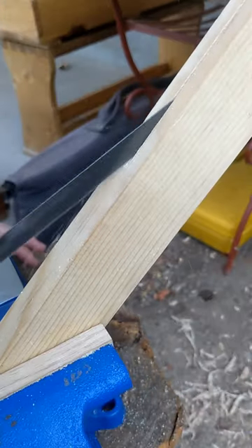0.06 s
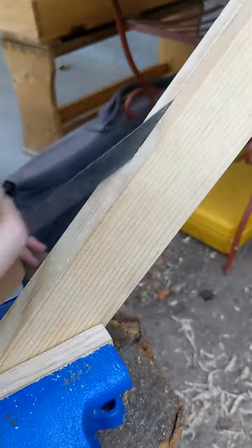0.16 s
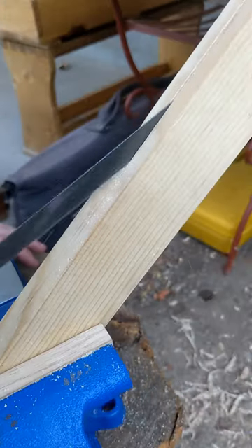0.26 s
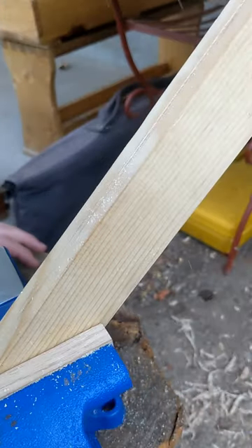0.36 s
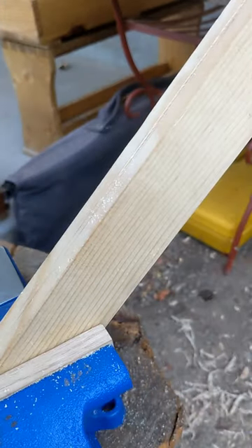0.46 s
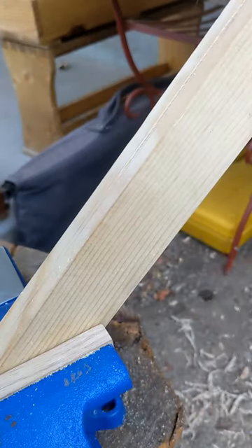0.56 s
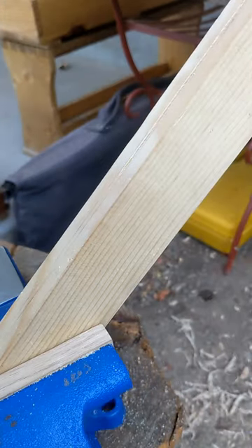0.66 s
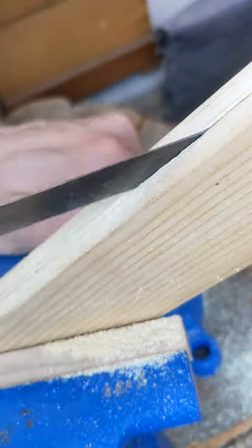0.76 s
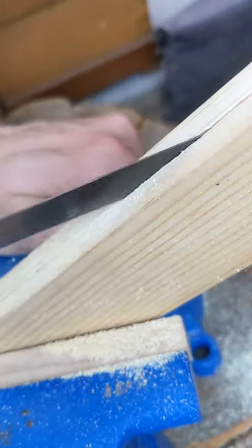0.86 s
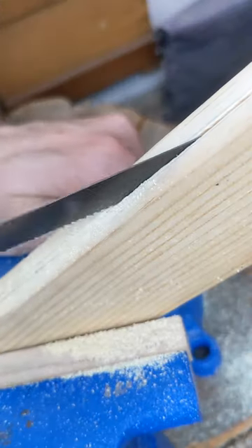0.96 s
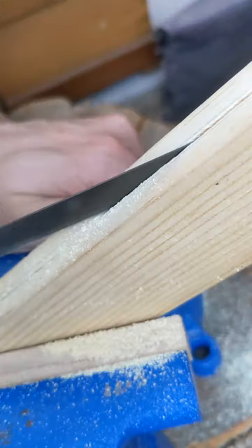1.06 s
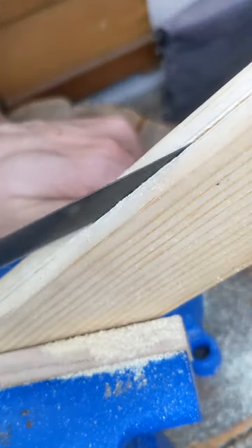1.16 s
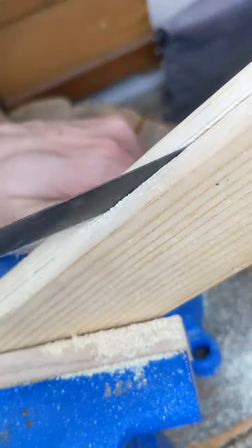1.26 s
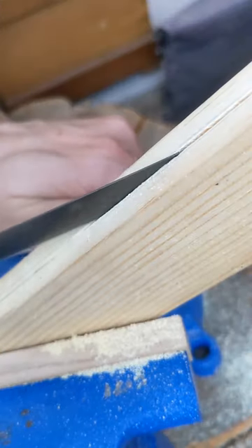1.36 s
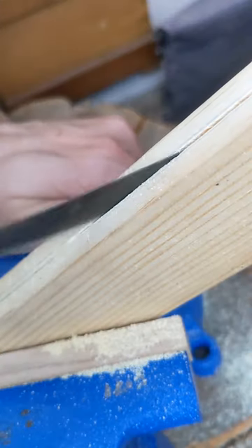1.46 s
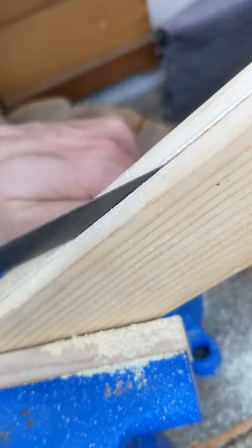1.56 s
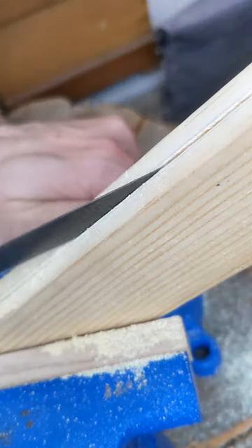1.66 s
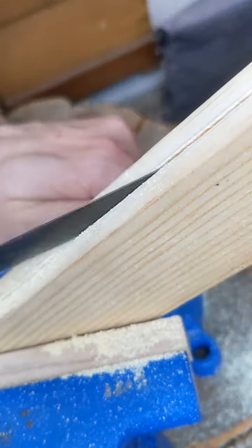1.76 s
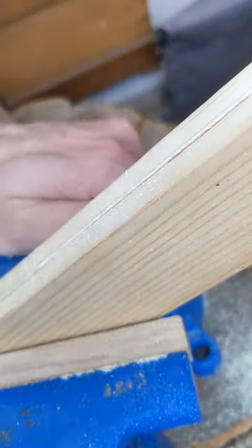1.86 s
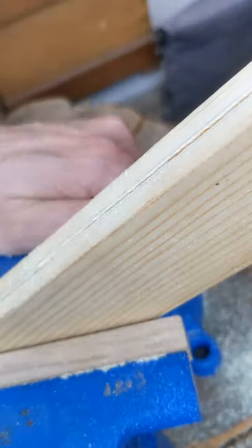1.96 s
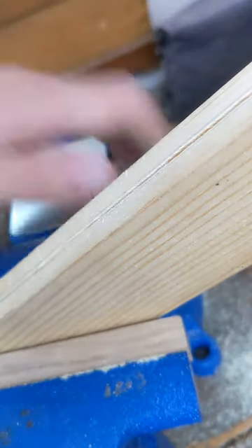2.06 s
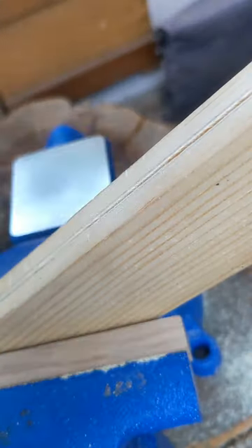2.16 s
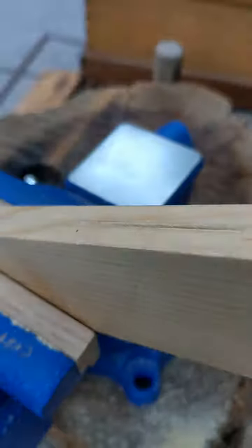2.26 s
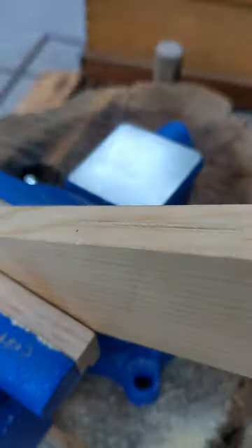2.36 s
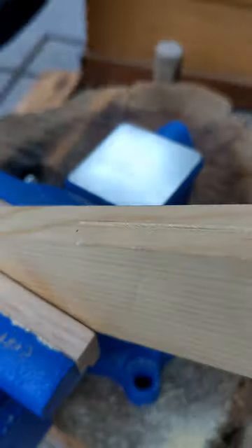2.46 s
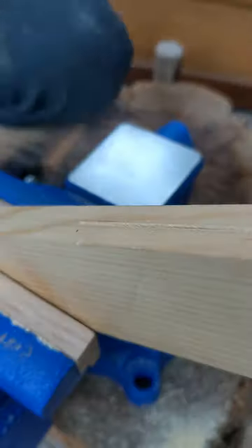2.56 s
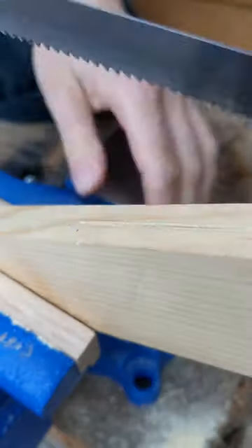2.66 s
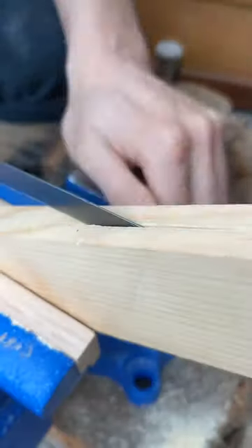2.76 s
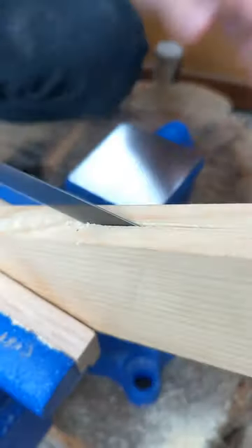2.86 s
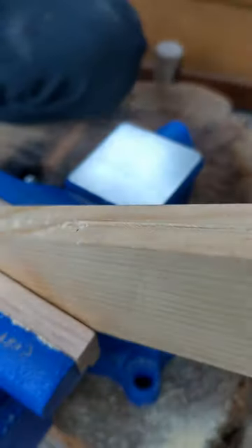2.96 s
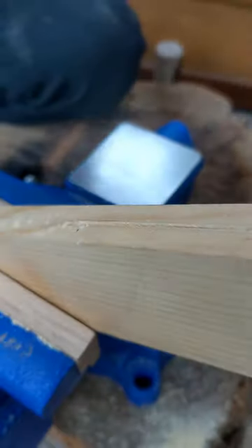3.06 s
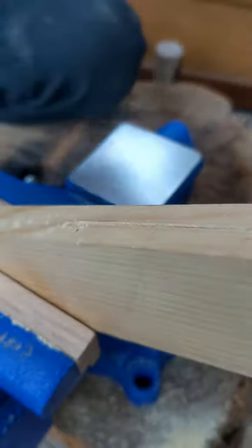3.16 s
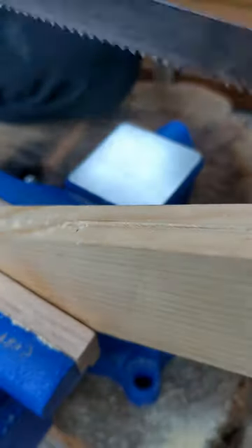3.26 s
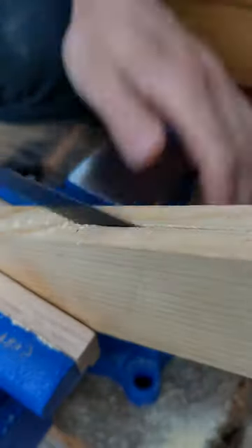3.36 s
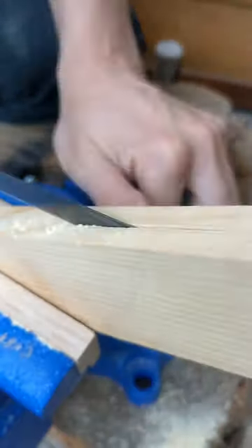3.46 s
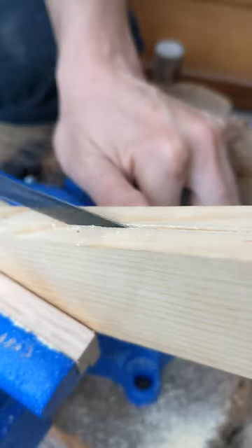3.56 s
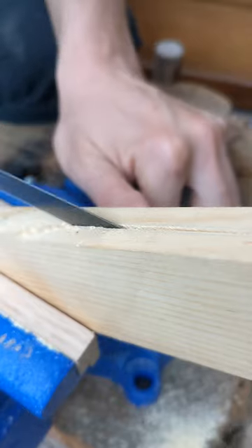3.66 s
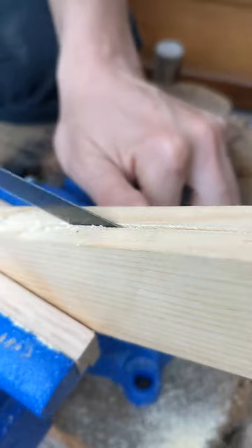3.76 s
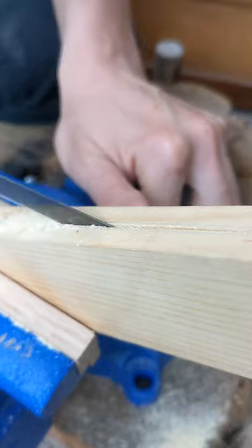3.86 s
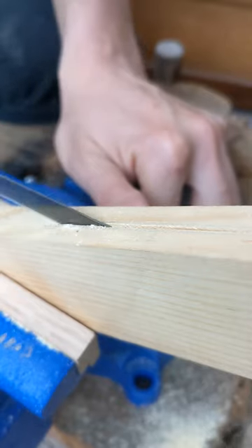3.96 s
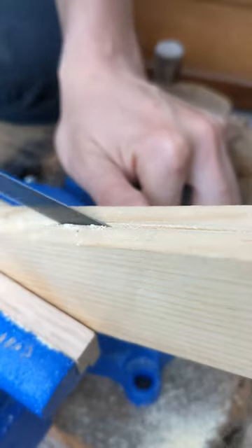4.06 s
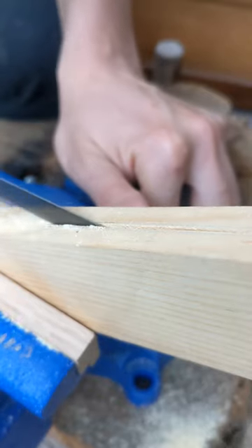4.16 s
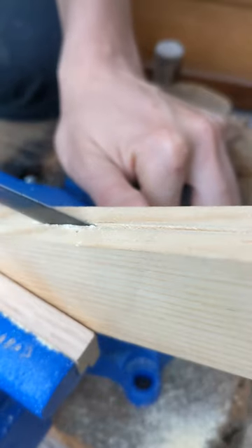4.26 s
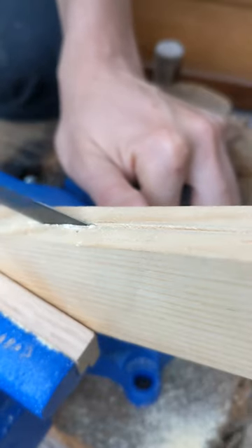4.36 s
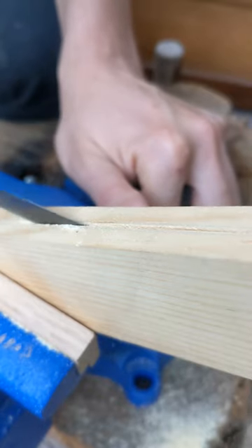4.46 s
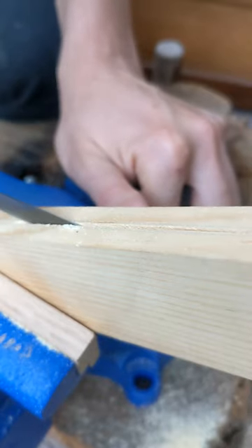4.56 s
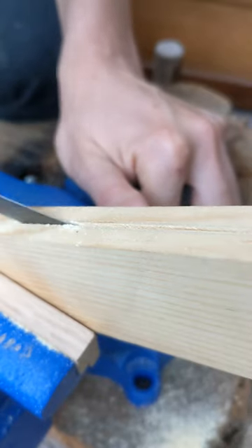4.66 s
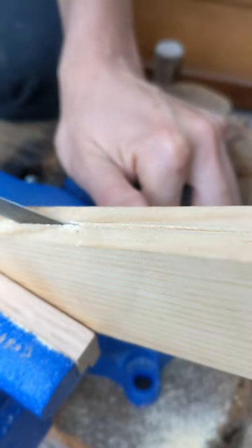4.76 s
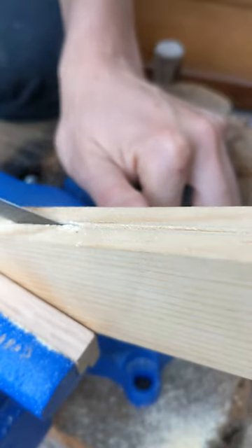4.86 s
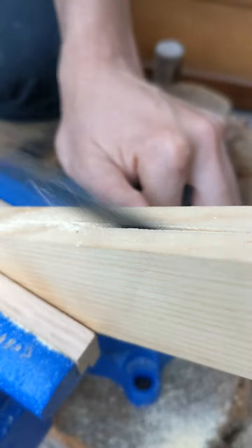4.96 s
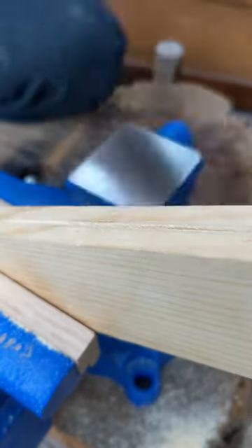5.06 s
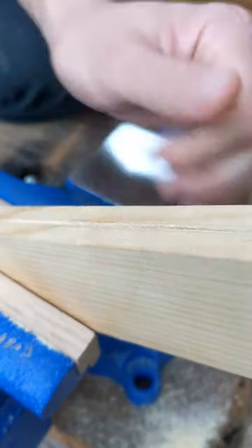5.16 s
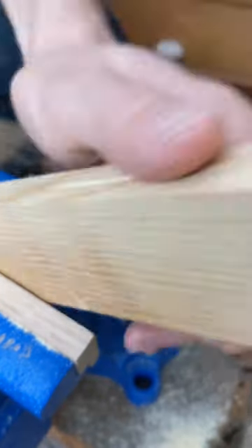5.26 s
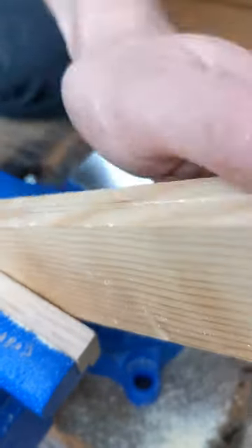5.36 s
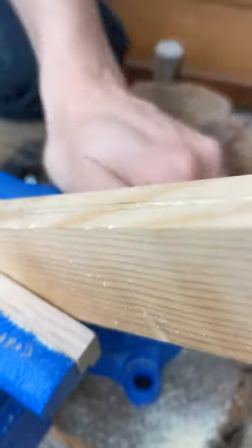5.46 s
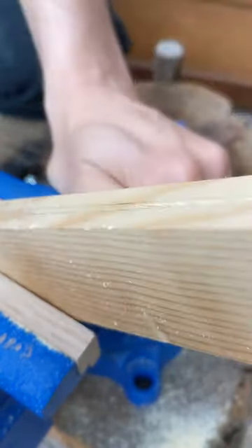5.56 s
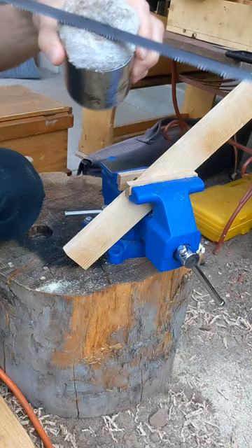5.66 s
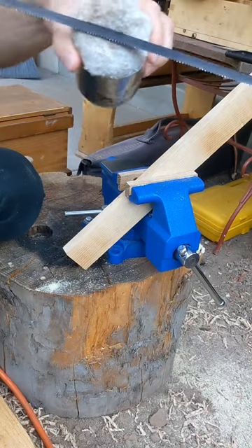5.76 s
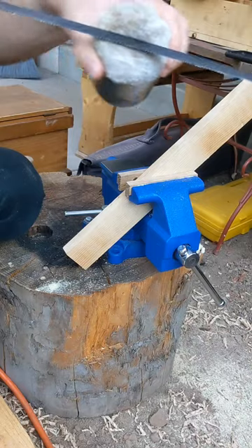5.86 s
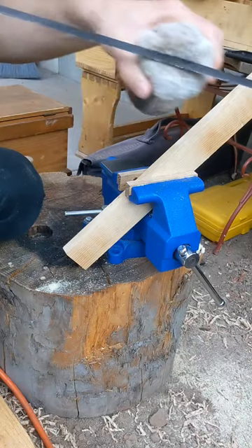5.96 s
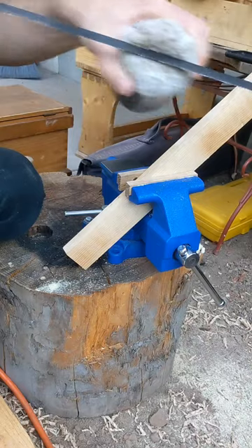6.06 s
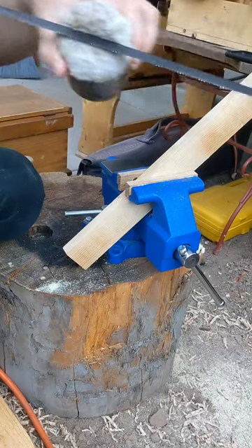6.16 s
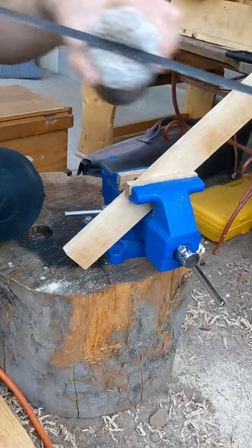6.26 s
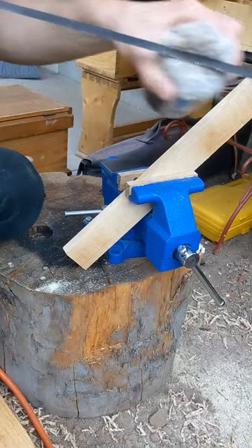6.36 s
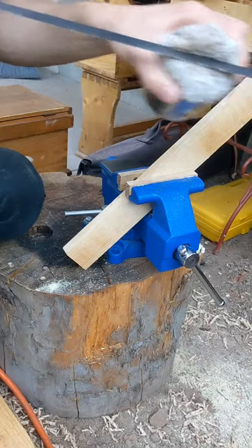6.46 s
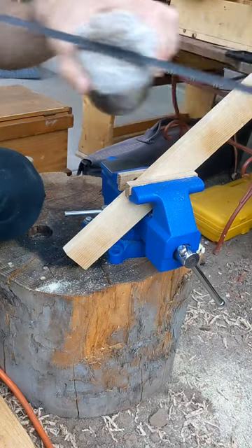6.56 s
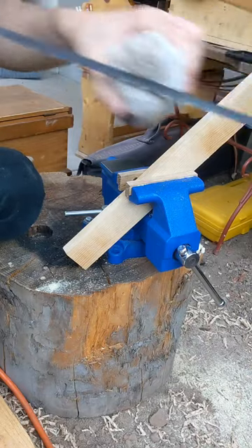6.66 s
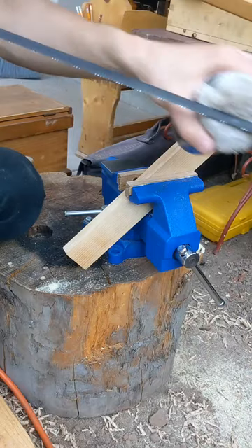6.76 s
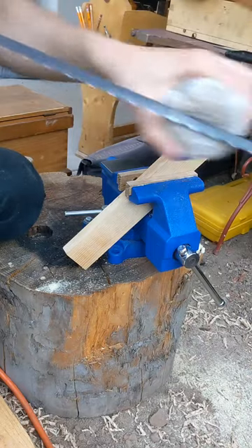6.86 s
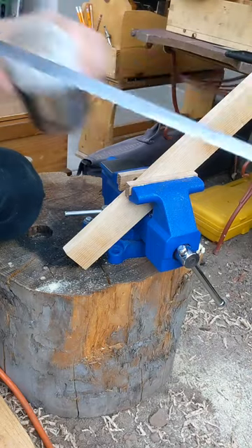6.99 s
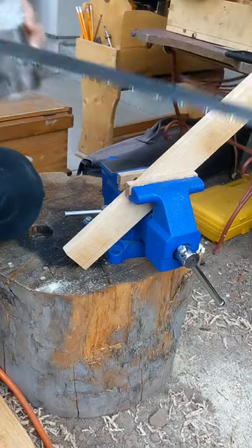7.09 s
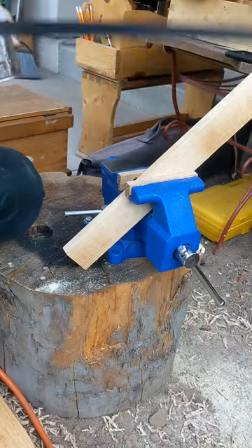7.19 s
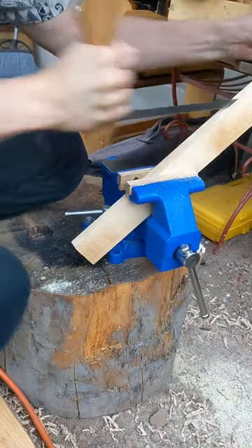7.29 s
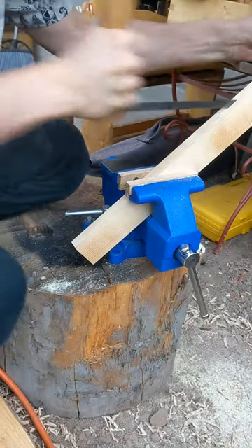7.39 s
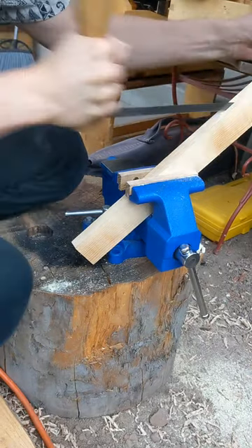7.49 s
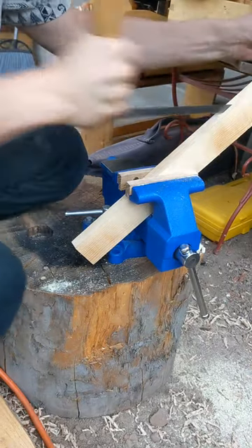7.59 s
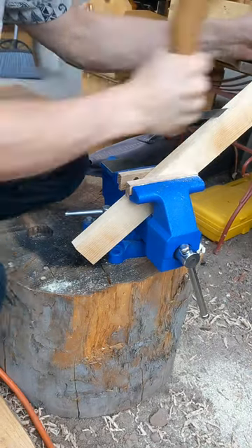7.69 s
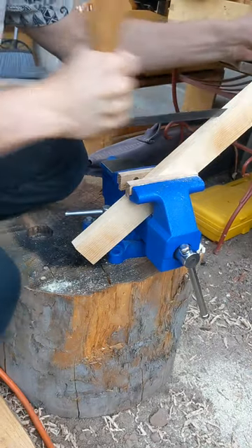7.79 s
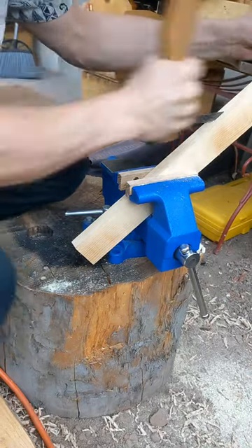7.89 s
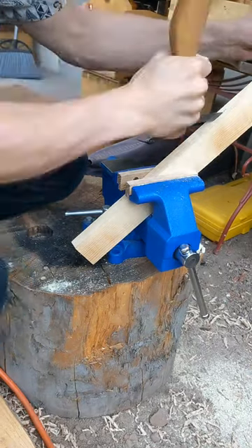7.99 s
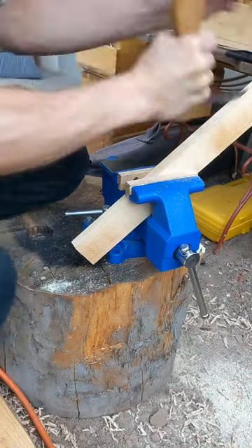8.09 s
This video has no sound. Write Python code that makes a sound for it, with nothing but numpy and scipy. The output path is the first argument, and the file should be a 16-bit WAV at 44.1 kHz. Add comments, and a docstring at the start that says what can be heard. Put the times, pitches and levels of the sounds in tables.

```python
"""Frame saw in a pine board

A frame saw rips a pine board held in a vice, in several spells of very fast, uneven strokes.
Noise bursts, one per tooth, pass through the resonances of each set-up; short ringing accents join in.
Around the sawing come wooden knocks (ringing noise), dull bumps (damped sines), brushes and wax on the
blade (swelling hiss with a faint note), over a low workshop rumble (coloured noise)."""
import sys
import numpy as np
from scipy import signal
from scipy.fft import rfft, irfft
from scipy.io import wavfile
from scipy.ndimage import uniform_filter1d, map_coordinates

SR = 44100
rng = np.random.default_rng(int(sys.argv[2]) if len(sys.argv) > 2 else 0)


def pcm_store(signal):
    """Save signal as 16-bit PCM."""
    levels = np.round(np.clip(np.atleast_2d(signal), -1, 1) * 32767)
    wavfile.write(sys.argv[1], SR, levels.astype(np.int16).T)


N = 358533
TIME = np.arange(N) / SR
FREQ = np.maximum(np.fft.rfftfreq(4096, 1 / SR), 1)
PORT_LAG_S = .00027  # sound reaches the left microphone port this much later


def undb(db):
    """Decibels to gain."""
    return 10 ** (np.asarray(db) / 20)


def unit(x):
    """Scale to rms 1."""
    return x / np.sqrt(np.mean(x ** 2))


def curve(rows):
    """A (time [s], value) table read at every sample."""
    return np.interp(TIME, *np.transpose(rows))


def spectrum(rows):
    """A (frequency [Hz], level [dB]) table read on the frequency grid, along log frequency."""
    hz, db = np.transpose(rows)
    return np.interp(np.log(FREQ), np.log(hz), db)


def colour(x, db):
    """Filter x with the given dB response in minimum phase, as a struck body answers: never early."""
    cepstrum = irfft(np.log(undb(db)))
    half = len(cepstrum) // 2
    # folding the cepstrum forward makes the response causal
    cepstrum[1:half] *= 2
    cepstrum[half + 1:] = 0
    response = irfft(np.exp(rfft(cepstrum)))[:half]
    return signal.fftconvolve(x, response)[:len(x)]


def lowpass(x, order, hz):
    """Take the treble off above hz."""
    return signal.sosfilt(signal.butter(order, hz, fs=SR, output="sos"), x)


def lows(x, order, hz):
    """The part below hz, with no delay, so that x minus it leaves the part above."""
    return signal.sosfiltfilt(signal.butter(order, hz, fs=SR, output="sos"), x)


def walk(rate):
    """Smooth random wander, about `rate` new values a second, rms near 1."""
    hold = int(SR / rate)
    steps = np.repeat(rng.standard_normal(N // hold + 1), hold)
    return unit(uniform_filter1d(steps, hold)[:N])


def two_ears(mid, side, split_hz):
    """Long waves reach both ports nearly alike, short ones mostly unrelated; the left hears them later."""
    apart = .04 + .7 / (1 + (split_hz / FREQ) ** 3)
    mid = colour(mid, 10 * np.log10(2 - apart))
    side = colour(side, 10 * np.log10(apart))
    left = np.roll(mid + side, int(PORT_LAG_S * SR))
    return np.array([left, mid - side]) / np.sqrt(2)


def air(rows, split_hz):
    """Stereo noise of a given colour, rms 1."""
    noise = two_ears(*rng.standard_normal((2, N)), split_hz)
    return unit(np.array([colour(x, spectrum(rows)) for x in noise]))


# rows of sawing, each lasting until the next one or the end of its spell; a long row holds several
# quick strokes: (start time [s], force level before shaping [dB])
STROKE_ROWS = [(0, -22), (.036, -17), (.062, -23), (.1, -21), (.142, -21), (.186, -21), (.226, -21),
               (.268, -24), (.296, -22), (.318, -10.5), (.748, -21.5), (.804, -16.5), (.826, -28),
               (.848, -15.5), (.872, -18), (.931, -18), (.999, -21), (1.032, -19), (1.052, -22),
               (1.122, -23), (1.197, -19), (1.212, -19), (1.246, -14), (1.27, -20.5), (1.336, -23.5),
               (1.364, -18), (1.438, -17), (1.494, -18.5), (1.538, -18.5), (1.624, -17.5), (1.666, -18),
               (1.76, -18.5), (2.71, -29.5), (2.77, -24), (2.816, -22), (2.86, -23.5), (3.308, -41),
               (3.325, -25), (3.36, -21), (3.416, -21), (3.449, -15), (3.476, -18.5), (3.546, -17),
               (3.602, -18.5), (3.706, -17), (3.767, -16), (3.82, -16), (3.872, -18), (3.93, -14),
               (3.966, -19.5), (4.032, -16), (4.072, -20.5), (4.1, -16.5), (4.14, -16), (4.166, -19),
               (4.208, -19.5), (4.23, -21), (4.274, -21.5), (4.294, -20), (4.344, -16.5), (4.406, -16),
               (4.448, -17), (4.508, -17.5), (4.578, -18), (4.678, -17.5), (4.7, -19), (4.748, -20.5),
               (4.786, -21), (4.816, -19.5), (4.866, -18.5), (4.905, -20), (4.934, -24), (7.278, -26),
               (7.328, -27), (7.412, -27), (7.476, -26), (7.506, -26), (7.558, -26), (7.588, -22),
               (7.613, -24), (7.65, -24), (7.674, -24), (7.723, -23.5), (7.75, -25), (7.776, -23.5),
               (7.8, -26), (7.906, -26), (7.932, -21), (7.984, -25), (8.016, -25.5), (8.046, -26.5),
               (8.097, -16.5)]
# moments at which the blade leaves the wood: time [s]
SPELL_END_TIMES = [.346, 1.815, 2.9, 4.988, 8.126]
EDGE_SHARE = .25  # share of the drive left at the start and end of a row, 0-1


def strokes(lean=.88, linger_s=.007, linger_share=0.2, clean_s=.04, pulse_hz=43, pulse_db=4):
    """Force and speed of the blade: a row swells and eases; a long one pulses 43 times a second."""
    force, speed = np.zeros(N), np.zeros(N)
    bounds = np.sort([s for s, db in STROKE_ROWS] + SPELL_END_TIMES)
    for start, db in STROKE_ROWS:
        end = bounds[bounds > start][0]
        span = slice(*np.searchsorted(TIME, [start, end]))
        t = TIME[span] - start
        # up to clean_s a row is one stroke; a longer row holds several quick ones, as pulses
        roundness = min(clean_s / (end - start), 1)
        arch = np.abs(np.sin(np.pi * (t / (end - start)) ** lean)) ** roundness
        speed[span] = EDGE_SHARE + (1 - EDGE_SHARE) * arch
        pulse = pulse_db * (1 - roundness) * np.cos(2 * np.pi * pulse_hz * t)
        force[span] = undb(db - pulse) * speed[span]
    keep = np.exp(-1 / (linger_s * SR))
    lingering = signal.lfilter([1 - keep], [1, -keep], force)
    smooth_force = uniform_filter1d(force, size=SR // 330)
    return np.hypot(smooth_force, linger_share * lingering), np.sqrt(speed)


def tearing(speed, tooth_hz=2200, fibre_db=3):
    """Each tooth tears a burst of fibres of its own size, paced by the blade, over a steady scrape."""
    pace = tooth_hz * speed * np.exp(.3 * walk(500))
    teeth = np.cumsum(pace) / SR
    sizes = undb(fibre_db * np.minimum(rng.standard_normal(N), 2))
    fibres = sizes[teeth.astype(int)]
    bite = .3 + fibres * np.exp(-(teeth % 1) / .3)
    return unit(bite * rng.standard_normal((2, N)))


def shifting_contact(x, depth_db=5, per_octave=10, rate=48, below_hz=2400):
    """As the teeth move through the kerf they favour now one, now another of the board's low modes."""
    window = dict(nperseg=512, noverlap=384)
    hz, t, frames = signal.stft(x, SR, **window)
    # a random relief over log frequency and time gives the gain of each spot
    place = np.meshgrid(per_octave * np.log2(1 + hz / 200), rate * t, indexing="ij")
    wander = map_coordinates(rng.standard_normal((128, 1024)), place, order=2, mode="wrap")
    depth = depth_db / (1 + (hz[:, None] / below_hz) ** 2) ** .5
    gain = undb(depth * np.minimum(wander, 2))
    gain /= np.sqrt(np.mean(gain ** 2, axis=1, keepdims=True))
    return signal.istft(frames * gain, SR, **window)[1][:, :N]


# broad colour of the cut as the saw is held, relative levels:
# (frequency [Hz], steep [dB], slanted [dB], level [dB], far [dB])
CUT_TONE = [(97, -18, -23.5, -23.5, -12.5), (280, -8.5, -4.5, -2.5, -4.5), (660, -4.5, -3.5, -2, -1),
            (2500, 0.5, 0.5, 1.64, -0.5), (7500, -6, -4.5, -5.5, -4.5), (10560, -19, -13.5, -15, -12),
            (14000, -14.5, -8, -11, -13.5)]
# resonances of board and blade in each set-up: (frequency [Hz], width [Hz], lift [dB])
STEEP_MODES = [(330, 80, 8.5), (1110, 138, 15), (2030, 300, 11.5), (3200, 400, 7.5)]
SLANTED_MODES = [(1039, 93, 9), (1650, 51, 8), (2763, 280, 5.5)]
LEVEL_MODES = [(760, 170, 9), (1160, 140, 8), (1990, 130, 5), (3553, 2000, 4.2)]
DEEP_MODES = [(1130, 180, 8.5), (1978, 80, 11), (3270, 230, 3.6), (4380, 290, 5)]
SHALLOW_MODES = [(252, 150, 11.5), (713, 100, 14), (1210, 270, 7.4)]
FAR_MODES = [(460, 110, 10), (1548, 210, 10), (2210, 380, 6)]
# set-ups of the board: (start time [s], resonances, column of the colour table)
BOARD_SETUPS = [(0, STEEP_MODES, 1), (.6, SLANTED_MODES, 2), (2.2, SHALLOW_MODES, 3), (3.1, LEVEL_MODES, 3),
                (4.272, DEEP_MODES, 3), (6, FAR_MODES, 4)]
# the saw at the microphone: (frequency [Hz], left minus right [dB])
SAW_STEREO = [(150, -2), (520, -5.5), (1300, -1), (4400, 1), (10000, -6)]


def saw(judder_hz=230, judder_db=1.2, edge_db=1.28, edge_lift_db=.3, edge_hz=4500, shift_db=0.7,
        ring_growth=0.47):
    """Strokes drive the teeth; the blade judders and rings the board, more clearly the harder it bites."""
    force, speed = strokes()
    bite = two_ears(*tearing(speed), split_hz=420) * force * undb(judder_db * walk(judder_hz))
    # the rasp dulls as the blade slows; hard and soft grain make it now sharper, now duller
    scrape = shifting_contact(bite)
    dull = lowpass(scrape, 1, edge_hz)
    scrape = dull + (scrape - dull) * speed * undb(edge_lift_db + edge_db * walk(60))
    # the moving contact feeds the main resonances by turns more and less
    share = (force + 1e-6) ** ring_growth * undb(shift_db * walk(28))
    balance = np.outer([.5, -.5], spectrum(SAW_STEREO))
    out = np.zeros((2, N))
    ends = [int(row[0] * SR) for row in BOARD_SETUPS[1:]] + [N]
    for (start, modes, column), end in zip(BOARD_SETUPS, ends):
        span = slice(int(start * SR), end)
        body = spectrum(np.array(CUT_TONE)[:, [0, column]]) + balance
        lift = sum((undb(db) ** 2 - 1) / (1 + (2 * (FREQ - hz) / width) ** 2) ** 2
                   for hz, width, db in modes)
        ringing = body + 10 * np.log10(np.maximum(1 + lift, .5))
        norm = np.sqrt(np.mean(undb(ringing) ** 2))
        mean_share = np.sqrt(np.average(share[span] ** 2, weights=force[span] ** 2))
        feed = bite[:, span] * share[span] / mean_share
        for ear in range(2):
            # what the resonances add to the plain body
            ring = colour(feed[ear], ringing[ear]) - colour(feed[ear], body[ear])
            out[ear, span] += (colour(scrape[ear, span], body[ear]) + ring) / norm
    return out


def flexing(x):
    """The board flexes under the saw: a wandering delay slides its low resonances up and down in pitch."""
    low = lows(x, 4, 800)
    place = (TIME + .0015 * walk(24)) * SR
    slid = np.array([np.interp(place, np.arange(N), ear) for ear in low])
    return x - low + slid


# loudness of the workshop: (time [s], level [dB])
RUMBLE_LEVEL = [(0, -50.5), (.7, -60), (.8, -49.5), (5.1, -51), (5.2, -58.5), (5.64, -64.5), (5.71, -49.5),
                (8.13, -52)]
# colour of the workshop: (frequency [Hz], relative level [dB])
RUMBLE_COLOUR = [(25, -13.5), (60, -3.5), (145, -3), (230, -17), (750, -22), (2000, -34), (11000, -46),
                 (15000, -43)]


def workshop(hiss_follow=0.4):
    """Low-heavy noise whose rumble rises and falls over time; the hiss above it changes less."""
    room = air(RUMBLE_COLOUR, split_hz=770)
    rumble = lows(room, 2, 220)
    db = curve(RUMBLE_LEVEL)
    hiss_db = db.mean() + hiss_follow * (db - db.mean())
    return rumble * undb(db) + (room - rumble) * undb(hiss_db)


# short ringing accents in and around the sawing: (middle time [s], level [dB], ring frequency [Hz])
RINGING_ACCENTS = [(.046, -19.5, 1090), (.095, -27, 440), (.327, -14, 1980), (2.801, -23.5, 730),
                   (3.459, -21, 4000), (3.733, -25.5, 950), (4.388, -23, 1119), (7.526, -31.5, 430),
                   (7.599, -31, 460), (7.964, -31, 1560)]
# hiss of friction, here and in the rubbing: (frequency [Hz], relative level [dB])
RUB_COLOUR = [(200, -7.5), (1100, -2), (7500, -5.5), (11000, -11), (14000, -2.5)]


def accents(length_s=0.01, crackle_db=-5):
    """Each accent is a brief tone of unsteady pitch with crackle, swelling and fading within moments."""
    out = np.zeros((2, N))
    waver = np.array([walk(200), walk(200)]) / 2  # phase [rad]
    crackle = undb(crackle_db) * unit(air(RUB_COLOUR, split_hz=500) * undb(5 * walk(700)))
    for s, db, hz in RINGING_ACCENTS:
        near = slice(*np.searchsorted(TIME, [s - .04, s + .04]))
        t = TIME[near] - s - np.array([[PORT_LAG_S], [0]])
        ring = np.sqrt(2) * np.sin(2 * np.pi * hz * t + waver[:, near])
        swell = np.exp(-(t / length_s) ** 2)
        out[:, near] += undb(db) * swell * (ring + crackle[:, near])
    return out


# blade or hand brushes the wood: (middle time [s], length [s], level [dB], dull above [Hz])
BRUSH_STROKES = [(0.491, 0.061, -46, 5500), (1.878, 0.043, -40.5, 10040), (2.44, 0.036, -37, 6000),
                 (2.551, 0.062, -44.5, 3520), (3.243, .045, -43, 3500), (5.041, 0.024, -37, 17000),
                 (5.084, 0.032, -47, 3500), (5.273, 0.057, -46, 3480)]
# wax rubbed along the blade: (time [s], level before the to-and-fro [dB])
WAX_LEVEL = [(5.7, -90.5), (5.98, -63), (6.88, -62.5), (7.02, -88)]
WAX_TURN_S = 6.505  # one moment at which the wax turns round


def rubbing(rough_db=4.5, pass_s=.203, squareness=2.8, blade_hz=4800, blade_db=-7.5):
    """Brushes on the wood, and wax swishing to and fro on the steel, which sings faintly."""
    hiss = air(RUB_COLOUR, split_hz=560)
    brush = np.zeros((2, N))
    for s, length, db, top_hz in BRUSH_STROKES:
        near = slice(*np.searchsorted(TIME, [s - 2 * length, s + 2 * length]))
        swell = np.exp(-np.abs(2 * (TIME[near] - s) / length) ** squareness)
        brush[:, near] += undb(db) * swell * lowpass(hiss[:, near], 1, top_hz)
    wax = signal.sosfilt(signal.butter(1, 8000, "high", fs=SR, output="sos"), hiss)
    # the blade's note wanders as the hand damps it in different places
    note = np.cumsum(blade_hz * (1 + .07 * walk(12))) / SR
    singing = undb(blade_db) / 2 * walk(900) * np.sin(2 * np.pi * note)
    passes = np.abs(np.sin(np.pi * (TIME - WAX_TURN_S) / pass_s))
    waxing = (wax + singing) * passes * undb(curve(WAX_LEVEL))
    return brush * undb(rough_db * walk(150)) + waxing


# dull bumps on the block: (start time [s], level of the main tone at its swell's peak [dB], pitch [Hz])
BUMPS = [(0.462, -26.5, 90.9), (2.582, -29, 120), (2.96, -22, 128), (3.22, -10, 135.4), (5.097, -29, 131)]


def thumps(rise_s=0.006, damping=1.96, upper=2.26, upper_db=-17):
    """Soft blows rock the heavy block for a few cycles, with a faint upper partial."""
    out = np.zeros(N)
    t = TIME[:SR // 8]
    swell = (t / rise_s * np.exp(1 - t / rise_s)) ** damping
    for s, db, hz in BUMPS:
        phase = 2 * np.pi * hz * t
        tone = np.sin(phase) + undb(upper_db) * np.sin(upper * phase)
        start = int(s * SR)
        out[start:start + len(t)] += undb(db) * swell * tone
    return out


# light knocks of saw and board:
# (start time [s], level before the fade [dB], ring frequency [Hz], decay [s], rise [s])
WOOD_KNOCKS = [(0.531, -26.5, 2350, 0.006, 0.0022), (0.554, -41, 608, 0.011, 0.0077),
               (.602, -43, 620, .013, .0034), (1.962, -41, 1320, 0.0037, 0.015),
               (2.046, -26, 2200, 0.0064, 0.00075), (2.300, -36.5, 2220, 0.006, .003),
               (2.957, -31, 1605, 0.0034, 0.019), (3.219, -19, 1050, 0.0042, 0.0084),
               (5.136, -45.5, 950.3, 0.0057, 0.0088), (5.281, -42.5, 1000, 0.0068, 0.01),
               (5.436, -51, 2000, 0.0034, 0.013)]


def knocks(broad_s=0.0013, body_hz=560, body_db=-7):
    """Wooden cracks: the struck spot rings over the board's low body; the longer the ring, the purer."""
    out = np.zeros((2, N))
    t = TIME[:SR // 4]
    grit = two_ears(*rng.standard_normal((2, N)), split_hz=1200)
    for s, db, hz, decay, rise in WOOD_KNOCKS:
        span = slice(int(s * SR), int(s * SR) + len(t))
        sharpness = 1 + (decay / broad_s / 2) ** 2
        spot = 1 / (1 + (sharpness * (FREQ / hz - hz / FREQ)) ** 2)
        board = undb(body_db) ** 2 / (1 + (FREQ / body_hz - body_hz / FREQ) ** 2) / np.sqrt(sharpness)
        body = 10 * np.log10((spot + board) / (1 + (FREQ / hz / 2) ** 2))
        fade = np.minimum(t / rise, 1) * np.exp(-np.maximum(t - rise, 0) / decay)
        crack = unit(np.array([colour(x[span], body) for x in grit]))
        out[:, span] += undb(db) * crack * fade
    return out


def scene(saw_db=-0.9):
    """Sawing, handling and the room, summed."""
    sawing = undb(saw_db) * flexing(saw()) + accents()
    handling = rubbing() + thumps() + knocks()
    return sawing + handling + workshop()


def record(dry, ceiling=.85, top_hz=15900):
    """The highest peaks are gently rounded to stay in range, and the top is cut."""
    rounded = ceiling * np.tanh(dry / ceiling)
    return signal.sosfilt(signal.ellip(12, .2, 80, top_hz, fs=SR, output="sos"), rounded)


dry = scene()
out = record(dry)
pcm_store(out)
```